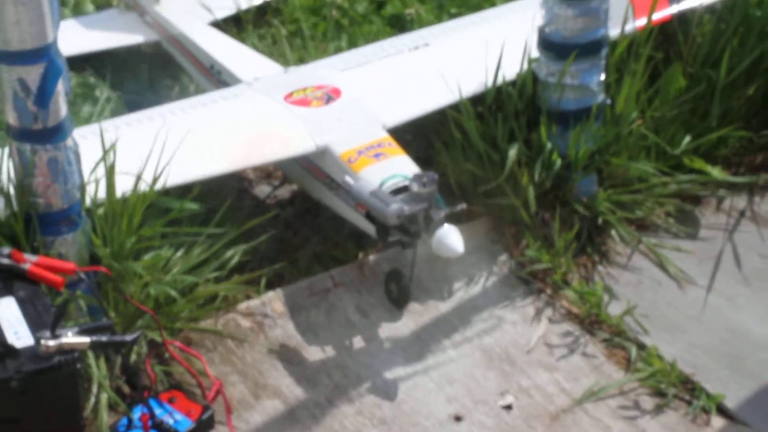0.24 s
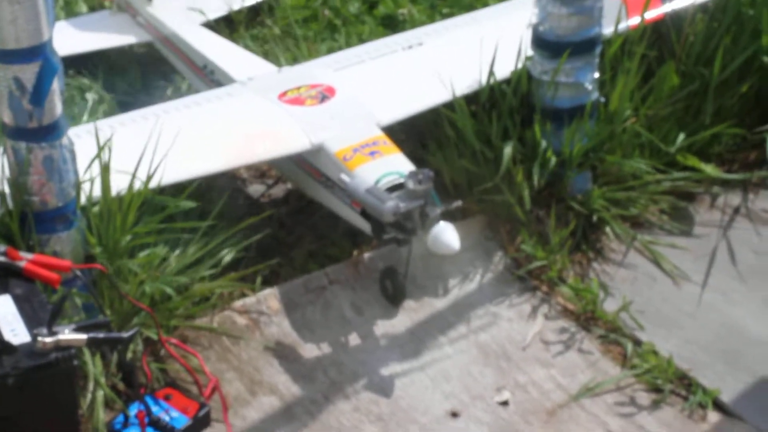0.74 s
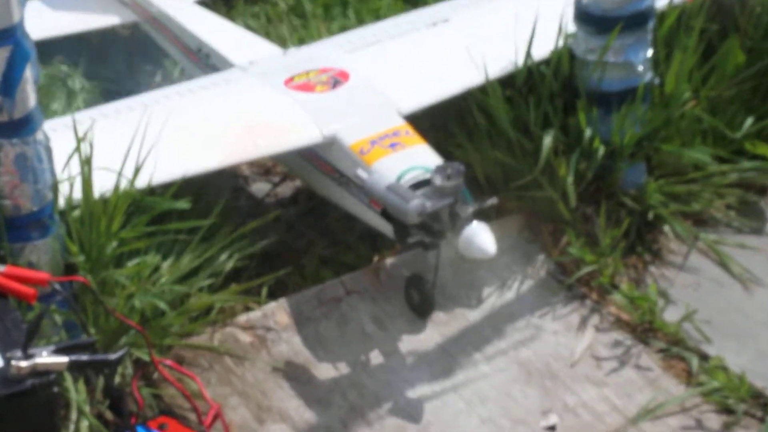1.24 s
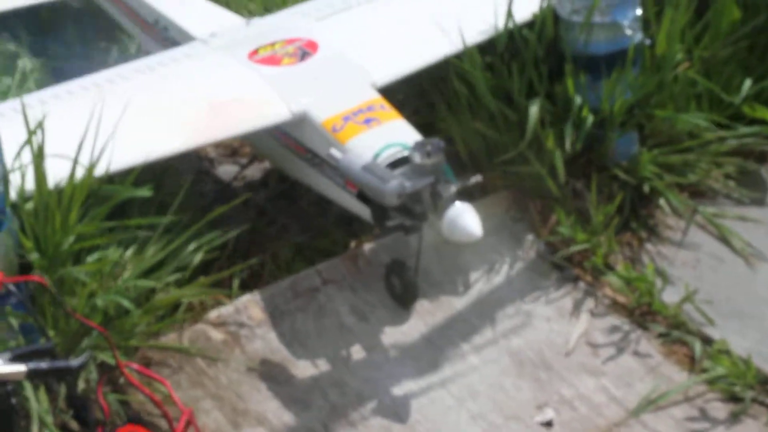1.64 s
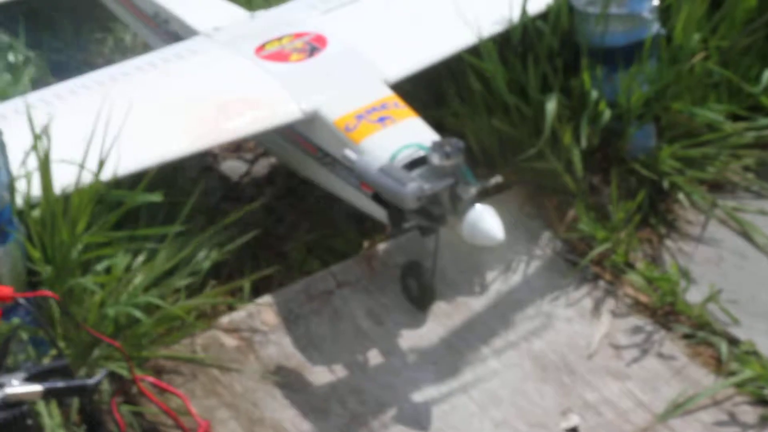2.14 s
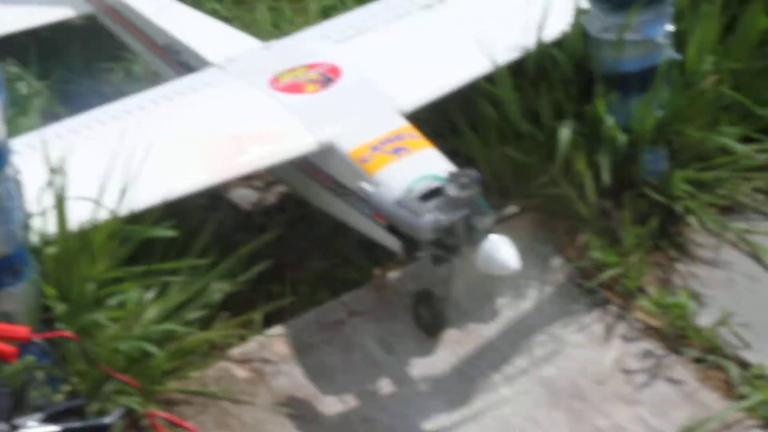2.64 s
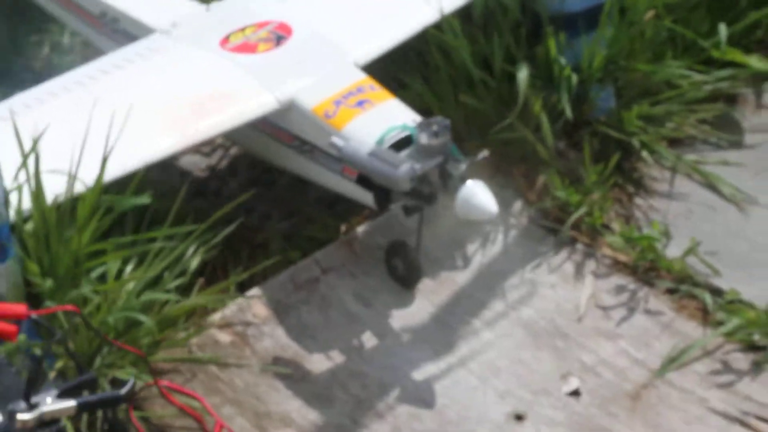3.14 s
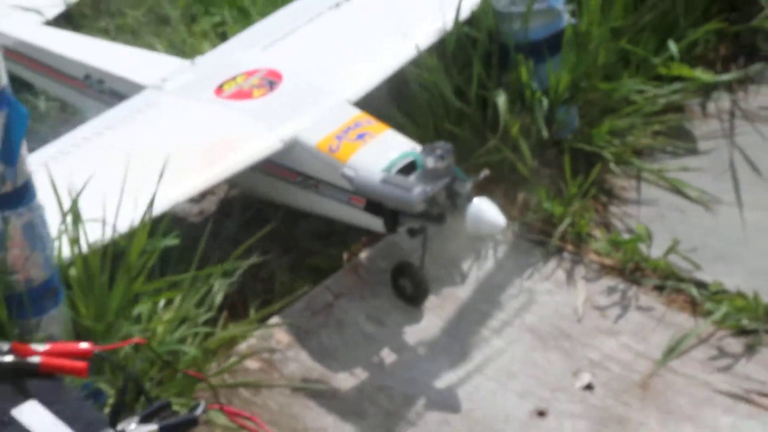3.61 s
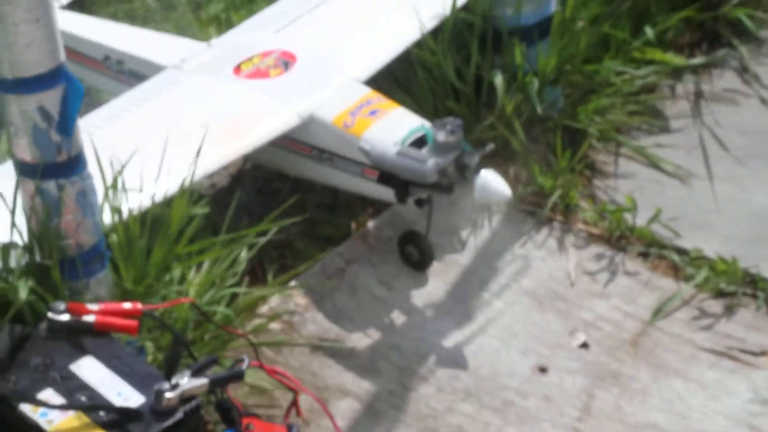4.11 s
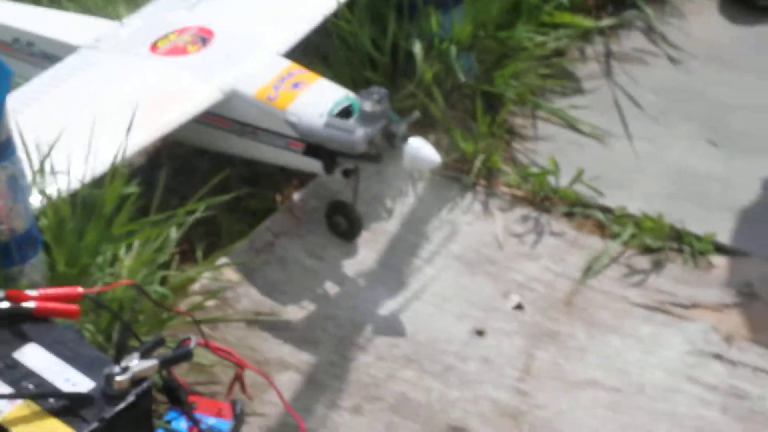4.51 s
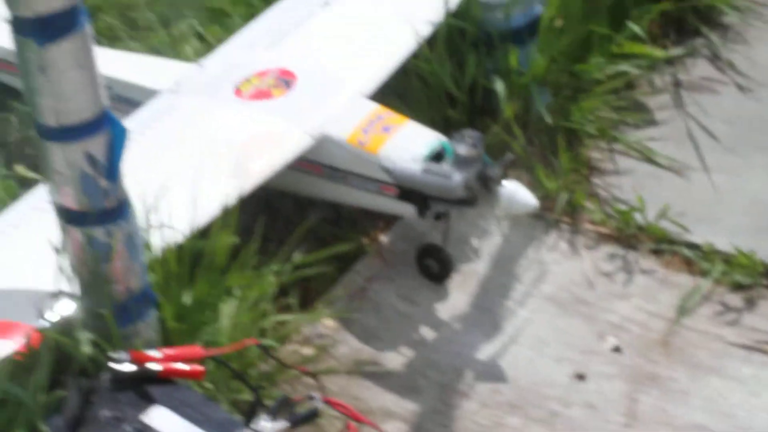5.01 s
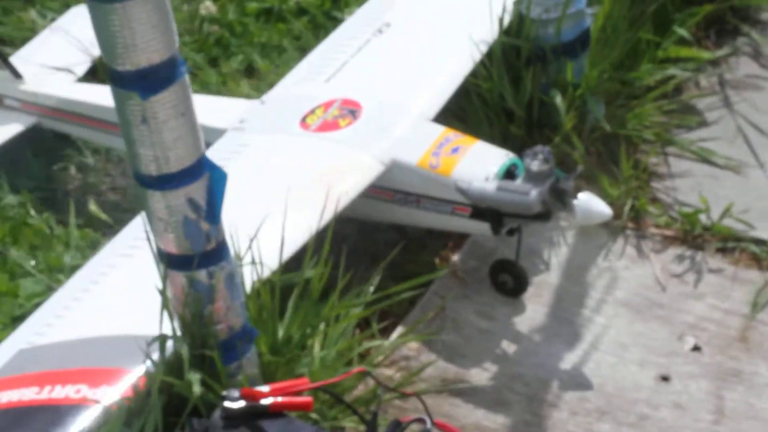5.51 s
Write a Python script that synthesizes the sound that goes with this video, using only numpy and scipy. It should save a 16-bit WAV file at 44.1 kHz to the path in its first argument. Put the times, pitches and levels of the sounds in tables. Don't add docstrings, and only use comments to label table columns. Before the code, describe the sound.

A small two-stroke model airplane engine runs without pause at nearly constant high speed, close to a hand-held camera over concrete. The hard nasal muffler buzz crackles with brief misfires and tiny dips in speed. The propeller adds a hum and fluttering hiss. As the camera swings from above the wing to beside the nose, the tone shifts and gains bright metallic rattle; faint low wind bumps appear later.

```python
import sys
import numpy as np
from scipy import signal
from scipy.fft import rfft, irfft, next_fast_len
from scipy.io import wavfile
from scipy.ndimage import uniform_filter1d, map_coordinates

SR = 44100
rng = np.random.default_rng(int(sys.argv[2]) if len(sys.argv) > 2 else 0)


def int16_out(signal):
    q = np.round(np.clip(np.atleast_2d(signal).T, -1, 1) * 32767)
    wavfile.write(sys.argv[1], SR, q.astype(np.int16))


def nominal_scale(level):
    x = np.asarray(level, float) / 20
    return 10 ** x


N = 254016

# start_s (first weak turn), weak_turns, level_db
STUMBLES = [(0.019, 2.0, -7.0), (0.078, 3.0, -9.0), (0.126, 2.0, -7.0), (0.209, 3.0, -5.0),
            (0.559, 7.0, -6.0), (0.672, 2.0, -7.0), (0.977, 4.0, -7.0), (1.208, 6.0, -9.0),
            (1.304, 3.0, -8.0), (1.721, 3.0, -9.0), (1.78, 5.0, -7.0), (2.035, 3.0, -8.0),
            (2.118, 6.0, -9.0), (2.328, 3.0, -6.0), (2.576, 3.0, -5.0), (3.074, 5.0, -7.0),
            (3.34, 2.0, -6.0), (3.628, 4.0, -7.0), (3.687, 2.0, -7.0), (3.829, 2.0, -8.0),
            (4.152, 3.0, -7.0), (4.27, 4.0, -9.0), (4.348, 6.0, -10.0), (4.499, 2.0, -8.0),
            (4.89, 6.0, -9.0), (4.973, 2.0, -9.0), (5.354, 6.0, -10.0), (5.462, 5.0, -8.0),
            (5.629, 2.0, -6.0), (5.713, 4.0, -9.0)]
MISSES = [.161, .256, .743, .954, 1.6, 1.893, 2.011, 2.256, 2.446, 2.681, 2.844, 2.955, 3.145, 3.293, 3.475,
          3.522, 3.557, 3.77, 4.247, 4.715, 5.149, 5.289, 5.665]
FALTERS = [.173, .378, .86, 2.232, 2.422, 2.458, 2.693, 3.317, 3.935, 4.005, 4.211, 4.469, 4.779, 5.184,
           5.581, 5.677]
# start_s, speed_turns_per_s
MIXTURE = [(0.0, 170), (0.25, 172.9), (1.4, 171), (1.6, 172.2), (2.07, 169.6), (2.5, 171.3), (2.65, 175.2),
           (3.0, 169.2), (3.4, 172), (4.0, 172.4), (4.15, 171), (4.5, 170.1), (4.65, 174.9), (4.8, 171.2),
           (5.2, 174.6), (5.4, 172.4), (5.54, 172), (5.76, 173.4)]
# start_s, slab_echo_delay_ms, view (0 above the wing, 1 over the nose, 2 beside the nose)
CAMERA = [
    (0, .72, 0),
    (1.8, .72, 0),
    (2.2, .73, 1),
    (3.25, .72, 1),
    (3.75, .69, 2),
    (5.76, .69, 2),
]
# start_s, nearness_db, facing_cylinder (0-1), facing_outlet (0-1)
HAND = [(0, 0.5, 0.03, .1), (.3, -0.15, 0.02, 0), (.7, 0.5, 0, .1), (1.15, -0.1, 0.04, .1),
        (1.4, 0.2, 0.1, .2), (1.75, 0, 0.27, .1), (1.9, 1, 0.33, .1), (2.3, 0.8, 0.1, 0),
        (2.65, 0.5, 0.6, .1), (3.15, 1.5, 0.86, .1), (3.65, -0.06, 1, -.2), (3.95, 0, 1.04, -.1),
        (4.351, -0.5, 0.74, .4), (4.7, 0, 1, .8), (5.0, -1.5, 0.99, 0.7), (5.2, -0.3, 0.95, .8),
        (5.45, -0.75, 0.74, 1.1), (5.76, 0, 0.8, 1.1)]
# level_db, db_per_db_nearness, db_facing_cylinder, db_facing_outlet,
# db_per_turn_per_s over the usual speed
LEVEL_LAWS = dict(muffler=(-20.5, 2.13, -0.44, 0.54, 0.2), case=(-17.5, 1, 10, 2.7, 0.16),
              jet=(-7, -2.5, -0.1, 2.5, 0.16), lift=(1.64, 0.51, 1.4, -1.2, -0.085),
              shaft=(-38, 2.3, 1.2, 1.6, 0.72), blade=(-31.5, 2.5, -2, 1.2, 0.22),
              third=(-45.5, 1, 7, -1.8, 1.8), fourth=(-35, 1.87, -2, 3.9, .01),
              hiss=(-27.5, 3.23, -0.9, 0.7, 0.5))
# centre_s, half_length_s, depth_db
SLAB_NULLS = [(.6, 0.47, 2), (1.561, 0.21, 5.5), (2.45, 0.17, 5), (3.41, 0.2, 1.5), (4.007, 0.12, 4.5),
              (4.2, 0.48, 0), (4.94, 0.32, 1.5)]
# peak_s, peak_db
GUSTS = [(0.01, -64), (.24, -69), (.72, -63), (.95, -63), (1.83, -58), (2.48, -60), (2.95, -62),
         (3.099, -60), (3.51, -47), (3.721, -47), (3.96, -43), (4.96, -54), (5.17, -54), (5.75, -51)]

# pitch_hz, width_hz, level_db, polarity
BARK_MODES = [
    [(1027, 30, -26, -0.82), (1261, 210, -16, -0.6), (1672, 182, -11, -0.88), (2027, 113, -6.5, 1)],
    [(910, 470, -15.5, -0.73), (1223, 170, -17, -0.89), (1680, 210, -15, -0.82), (2090, 200, -10, 0.98)],
    [(1068, 226, -14.5, -0.99), (1330, 440, -23, -0.92), (1730, 360, -18.5, -1.04), (2040, 900, -13, 0.96)],
]
MUFFLER_MODES = [
    [(2420, 172, -14, 0.79), (2940, 65, -14.5, -1), (2766, 646, -11.5, -0.81), (3800, 1200, -22.5, 1),
     (4210, 140, -22, -1.2), (5600, 80, -44, 0.88)],
    [(2564, 266, -10, 0.97), (2733, 50, -11.5, 0.6), (3100, 130, -20, -1.05), (3520, 430, -15.5, -1.11),
     (4450, 93, -24, -0.82), (6300, 550, -23, -0.89)],
    [(2556, 133, -8.5, 0.82), (2970, 72, -27, -0.15), (3197, 255, -9, -1.12), (3720, 77, -10.5, -0.76),
     (4220, 480, -25.5, 0.7), (5680, 177.6, -59, -0.27)],
]
CASE_MODES = [(8260, 170, 0, 1), (8600, 500, -9, -1)]
OVERTONE_MODES = [(5634, 120, 1.5, 0.99)]
JET_ABOVE_MODES = [(9100, 900, -15, -0.93), (10320, 210, 2.5, 1), (11450, 300, -2, 0.89),
                   (12500, 550, -10, -0.95), (14150, 450, -7, -1)]
JET_OVER_MODES = [(9540, 830, -1.5, 1), (10870, 1200, -0.5, -0.98), (11300, 280, 7, 0.86),
                  (12600, 330, -0.5, -0.94), (15000, 900, -11, 0.88)]
JET_BESIDE_MODES = [(9800, 450, -2, 0.98), (10150, 300, -2, -1), (11240, 300, -0.5, 1),
                    (12400, 360, -10, -1), (13300, 900, -6.5, 0.95)]
THUMP_THIRD_MODES = [(507.5, 128, -1.5, -0.76)]
THUMP_FOURTH_MODES = [(680.3, 98, 0, 1)]
CHAMBER_MODES = [(278, 79, 5.5, 0.81), (430, 12, 18.5, -0.066), (602, 71, 5.5, 0.86)]

# pitch_hz, level_db (per Hz)
BLADE_HISS = [(30, -72), (200, -16), (1000, -15), (2800, -8), (5000, -13), (7000, -12), (12000, -5),
              (15800, -13)]
# pitch_hz, level_db (per Hz)
PORT_THUD = [(15, -35), (40, -19), (85, -2), (130, -6), (250, -13), (500, -62)]

FIRST_TURN = .27
USUAL_TURNS = 170
TURNS_LOST, RECOVER_S = 2.1, .08
MISS_DB, FALTER_DB = -7, -5
RING_LAG_S, JET_LAG_S = .0004, .0008
CALM_DB, GUST_RISE_S, GUST_FALL_S = -66, .09, .14
TOP_HZ = 15770


def unit(x):
    return x / np.sqrt(np.mean(x ** 2) + 1e-20)


def curves(rows):
    s, *columns = np.transpose(rows)
    t = np.arange(N) / SR
    return [np.interp(t, s, column) for column in columns]


def wobble(rate):
    knots = rng.standard_normal(int(N * rate / SR) + 4)
    return map_coordinates(knots, [np.arange(N) * rate / SR])


def filtered(x, response):
    m = next_fast_len(N + 8192)
    f = np.fft.rfftfreq(m, 1 / SR)
    return unit(irfft(rfft(x, m) * response(f), m)[:N])


def above(f, hz):
    return 1 / (1 + (hz / (f + 1)) ** 16)


def later(f, s):
    return np.exp(-2j * np.pi * f * s)


def ringing(x, modes):
    def response(f):
        return sum(polarity * nominal_scale(db) * 1j * f * width / (hz * hz - f * f + 1j * f * width)
                   for hz, width, db, polarity in modes)
    return filtered(x, response)


def noise(spectrum):
    hz, db = np.transpose(spectrum)
    return filtered(rng.standard_normal(N), lambda f: nominal_scale(np.interp(np.log(f + 1), np.log(hz + 1), db)))


def level(name, rate):
    db, *gains = LEVEL_LAWS[name]
    controls = [*curves(HAND), rate - USUAL_TURNS]
    return db + sum(gain * control for gain, control in zip(gains, controls))


def seen(x, views):
    place = curves(CAMERA)[1] / 2 * (len(views) - 1)
    return unit(sum(np.clip(1 - abs(place - k), 0, 1) ** 0.76 * ringing(x, modes)
                    for k, modes in enumerate(views)))


def off_slab(x, echo_db):
    delay = curves(CAMERA)[0] * SR / 1000
    return unit(x + nominal_scale(echo_db) * map_coordinates(x, [np.arange(N) - delay]))


def weak_spells():
    misses = [(s, 1, MISS_DB) for s in MISSES]
    falters = [(s, 1, FALTER_DB) for s in FALTERS]
    return list(STUMBLES) + misses + falters


def speed():
    lost = np.zeros(N)
    for s, count, db in weak_spells():
        at = np.round((s + 2 * np.arange(round(count)) / USUAL_TURNS) * SR).astype(int)
        lost[at[at < N]] += 1 - nominal_scale(db)
    smooth = uniform_filter1d(lost, size=SR // 40)
    sag = signal.lfilter([1], [1, -np.exp(-1 / (RECOVER_S * SR))], smooth)
    return curves(MIXTURE)[0] - TURNS_LOST * sag


def firings(turns):
    at = np.interp(np.arange(int(turns[-1]) + 1), turns, np.arange(N))
    chance = rng.standard_normal((len(at), 2))
    size_db = 0.3 * chance[:, 0]
    for s, count, db in weak_spells():
        weak = np.argmin(abs(at - s * SR)) + 2 * np.arange(round(count))
        weak = weak[weak < len(at) - 1]
        size_db[weak] += 1.17 * db
        size_db[weak + 1] += 1.2
    return at, size_db, 1.7 * chance[:, 1]


def pulses(at, size):
    taps = np.floor(at)[:, None] + np.arange(-7, 9)
    offset = taps - at[:, None]
    kernel = np.sinc(offset) * np.cos(np.pi * offset / 16) ** 2
    places = np.clip(taps, 0, N).astype(int)
    return np.bincount(places.ravel(), (kernel * size[:, None]).ravel(), N + 1)[:N]


def blast(at, size_db, rough, t60):
    click = pulses(at, nominal_scale(size_db))
    decay = signal.lfilter([1], [1, -nominal_scale(-60 / (t60 * SR))], click)
    puff = decay * rng.standard_normal(N)
    return np.sqrt(1 - rough) * unit(click) + np.sqrt(rough) * unit(puff)


def baffles(f, hz, width):
    return (hz * hz - f * f - 1j * f * width) / (hz * hz - f * f + 1j * f * width)


def muffler(at, size_db, lift_db):
    port = blast(at, .9 * size_db, rough=.018, t60=.04)
    views = [low + high for low, high in zip(BARK_MODES, MUFFLER_MODES)]
    pipe = off_slab(seen(port, views), echo_db=-3)
    bark = filtered(pipe, lambda f: above(f, hz=853) - above(f, hz=2260))

    def last_chamber(f):
        band = above(f, hz=2220) - above(f, hz=5740)
        return band * baffles(f, hz=2560, width=135) * later(f, RING_LAG_S)

    ring = filtered(pipe, last_chamber)
    return nominal_scale(-5 - lift_db) * bark + nominal_scale(-3.0 + lift_db) * ring


def case_knock(at, size_db, scatter_db, case_db):
    knock = blast(at, 2.5 * size_db + scatter_db, rough=0.32, t60=0.031)
    case = filtered(ringing(knock, CASE_MODES), lambda f: above(f, hz=6760))
    return nominal_scale(case_db - 2.7) * case + nominal_scale(-17.5) * ringing(knock, OVERTONE_MODES)


def outlet_jet(at, size_db, scatter_db, jet_db):
    gas = blast(at, 2.8 * size_db + scatter_db, rough=0.19, t60=0.013)
    jet = seen(gas, [JET_ABOVE_MODES, JET_OVER_MODES, JET_BESIDE_MODES])
    air = filtered(jet, lambda f: (above(f, hz=9500) - 1.16 * above(f, hz=14000)) * later(f, JET_LAG_S))
    return nominal_scale(jet_db - 1.8) * air


def nulls():
    t = np.arange(N) / SR
    return sum(db * np.exp(-((t - s) / half) ** 4) for s, half, db in SLAB_NULLS)


def thump(push, rate):
    third = ringing(push, THUMP_THIRD_MODES)
    fourth = ringing(ringing(push, THUMP_FOURTH_MODES), THUMP_FOURTH_MODES)
    fourth_db = level("fourth", rate) - nulls()
    return nominal_scale(level("third", rate) + 2.75) * third + nominal_scale(fourth_db + 2.0) * fourth


def exhaust(turns, rate):
    at, size_db, scatter_db = firings(turns)
    push = filtered(blast(at, .7 * size_db, rough=.005, t60=.02), lambda f: above(f, hz=210))
    chamber = nominal_scale(-18.0) * ringing(ringing(push, CHAMBER_MODES), CHAMBER_MODES)
    body = muffler(at, size_db, level("lift", rate)) + chamber
    body = body + case_knock(at, size_db, scatter_db, level("case", rate))
    body = body + outlet_jet(at, size_db, scatter_db, level("jet", rate))
    return nominal_scale(level("muffler", rate)) * body + thump(push, rate)


def propeller(turns, rate):
    angle = 2 * np.pi * turns
    shaft = nominal_scale(level("shaft", rate)) * np.sin(angle + 0.74)
    blade = nominal_scale(level("blade", rate)) * np.sin(2 * angle + 2.94)
    hiss_db = level("hiss", rate) + 2.1 * np.cos(2 * angle) + 0.79 * wobble(12)
    return np.sqrt(2) * (shaft + blade) + nominal_scale(hiss_db) * noise(BLADE_HISS)


def buffet():
    t = np.arange(N) / SR
    gusts = sum(nominal_scale(db - 20 * np.maximum((s - t) / GUST_RISE_S, (t - s) / GUST_FALL_S)) for s, db in GUSTS)
    calm = nominal_scale(CALM_DB + 2.8 * wobble(9)) * filtered(noise(PORT_THUD), lambda f: above(f, hz=62))
    lumps = unit(nominal_scale(4.0 * wobble(20)) * noise(PORT_THUD))
    return calm + gusts * nominal_scale(-3.5) * lumps


def scene():
    rate = speed()
    turns = np.cumsum(rate) / SR - FIRST_TURN
    return (exhaust(turns, rate) + propeller(turns, rate) + buffet())[None]


def low_pass(x):
    return signal.sosfilt(signal.butter(12, 15760, fs=SR, output="sos"), x)


def record(dry):
    heard = np.fft.rfftfreq(N, 1 / SR) < TOP_HZ
    mix = irfft(rfft(dry) * heard, N)
    return low_pass(mix)


dry = scene()
out = record(dry)
int16_out(out)
```